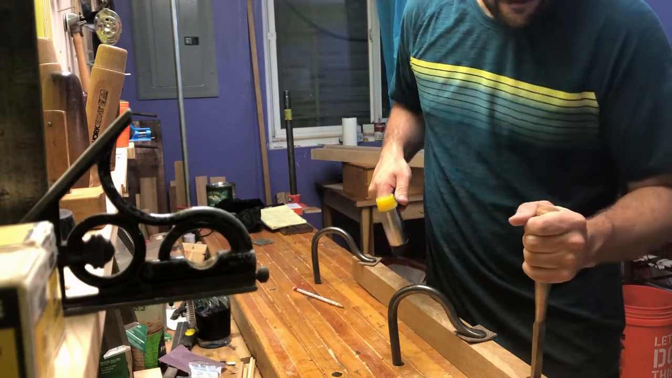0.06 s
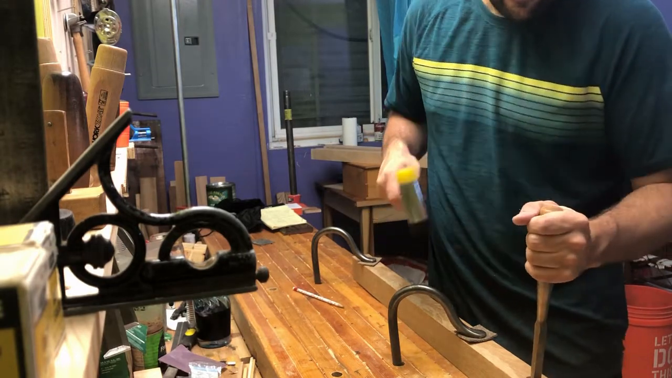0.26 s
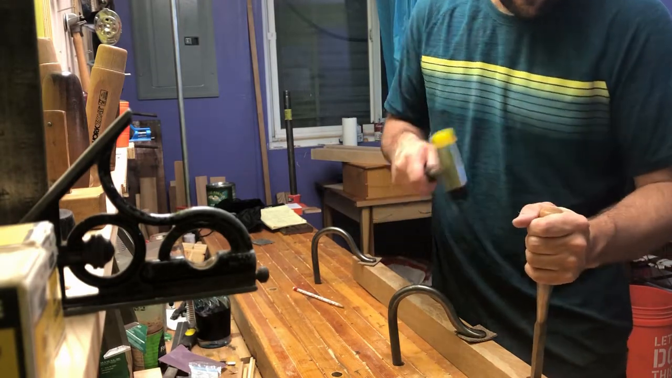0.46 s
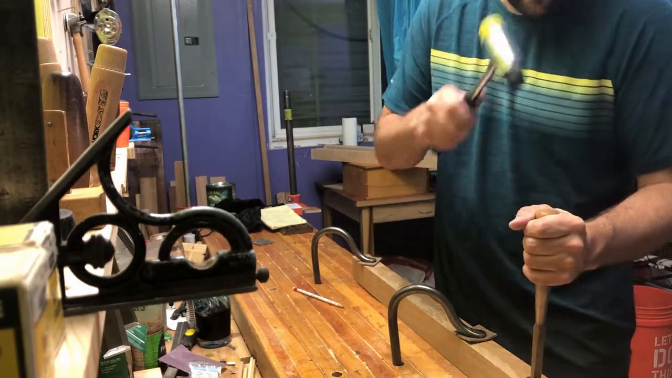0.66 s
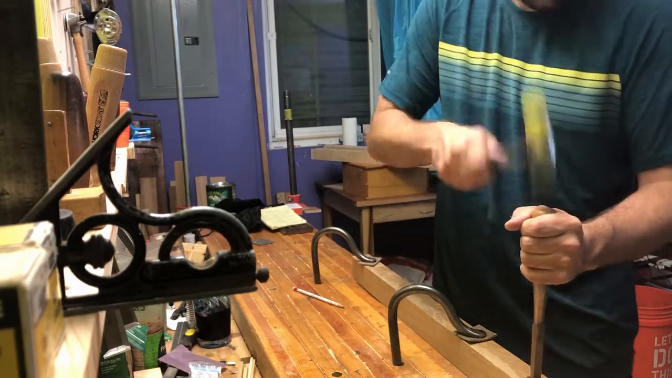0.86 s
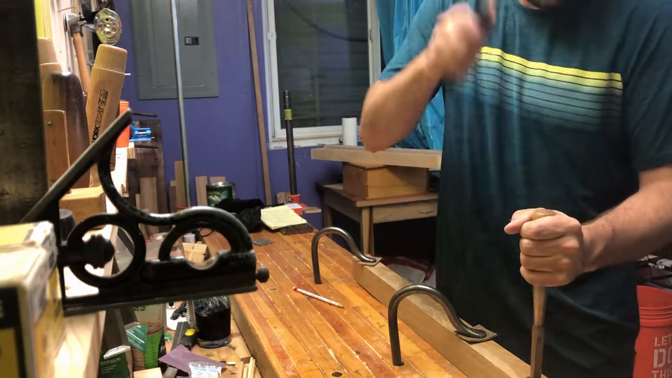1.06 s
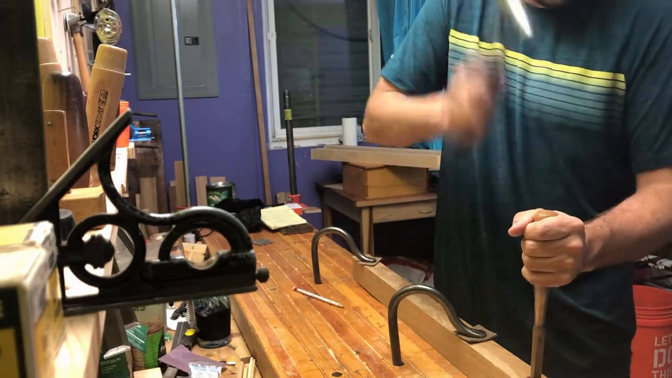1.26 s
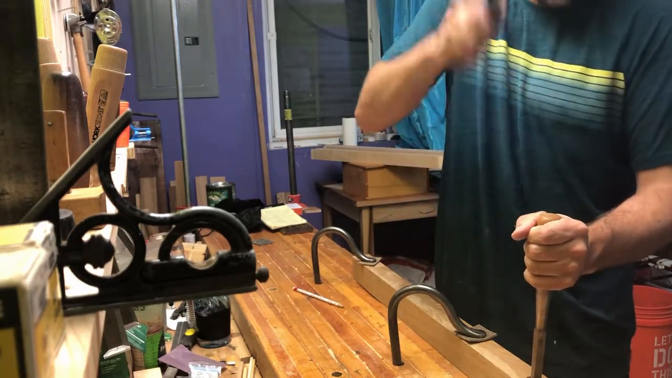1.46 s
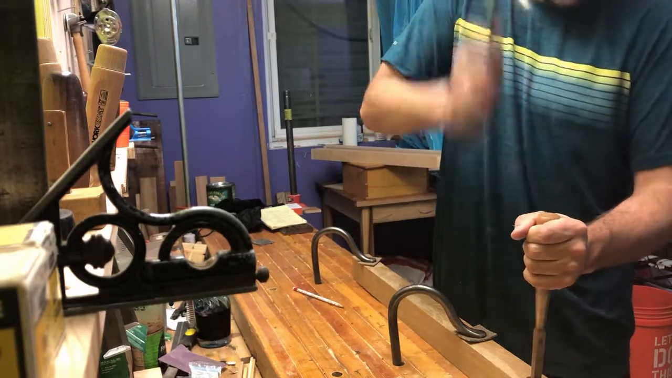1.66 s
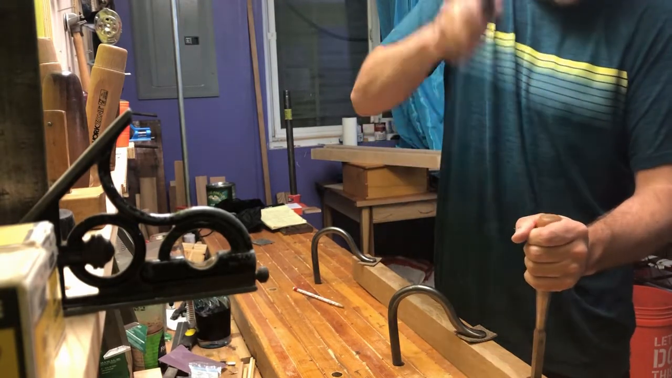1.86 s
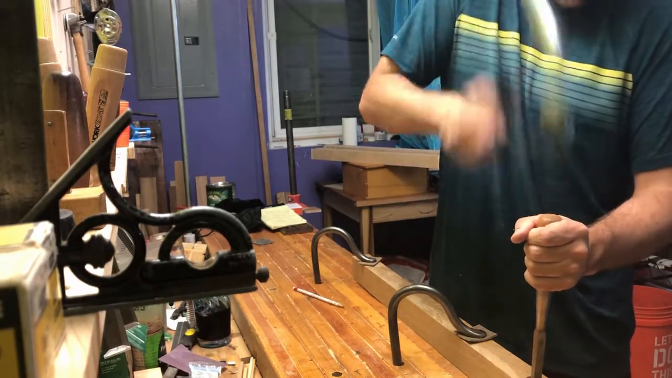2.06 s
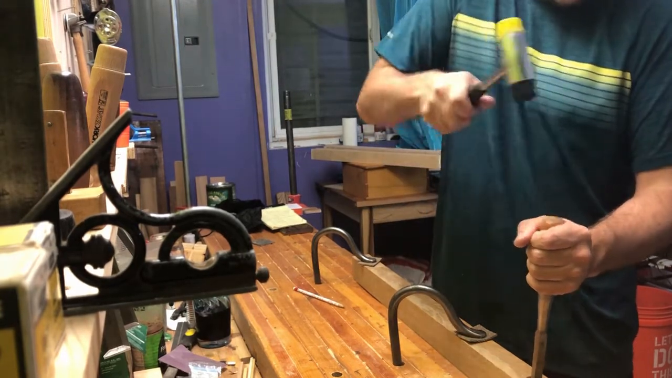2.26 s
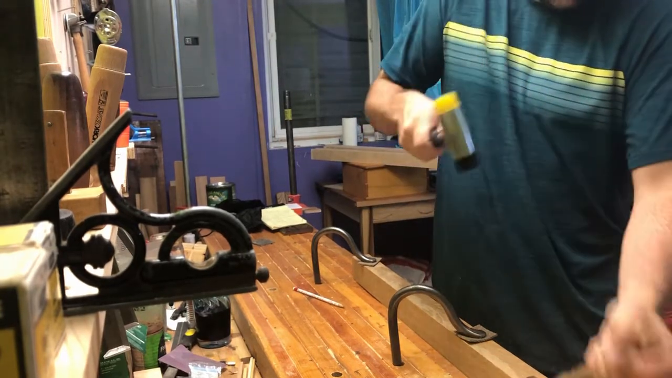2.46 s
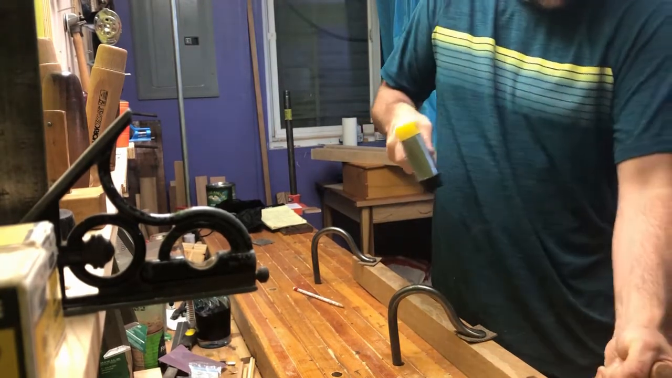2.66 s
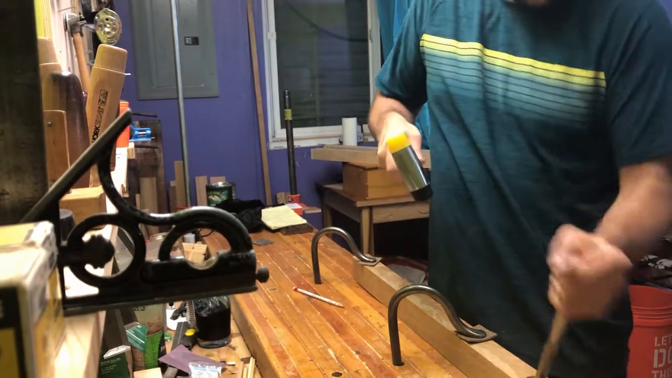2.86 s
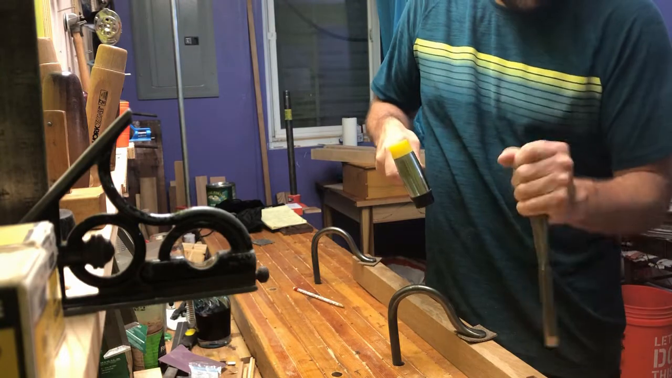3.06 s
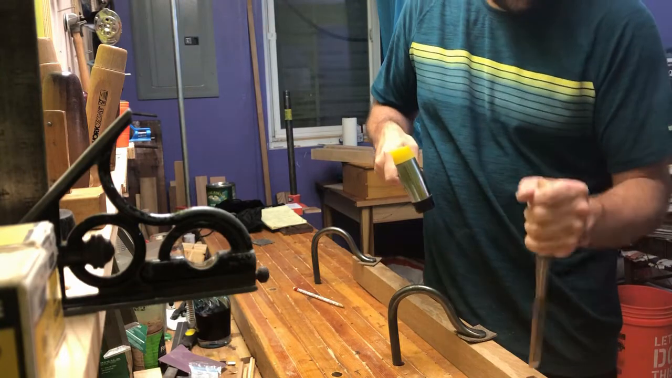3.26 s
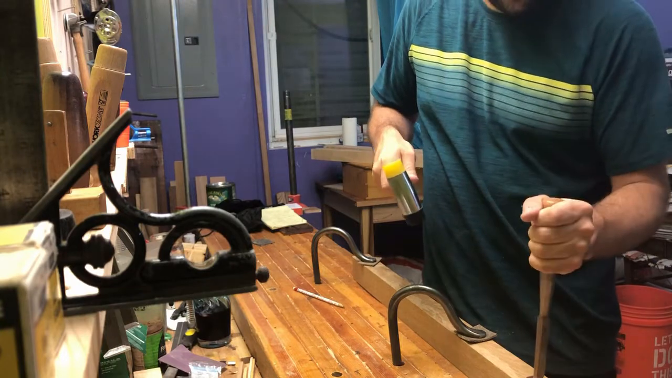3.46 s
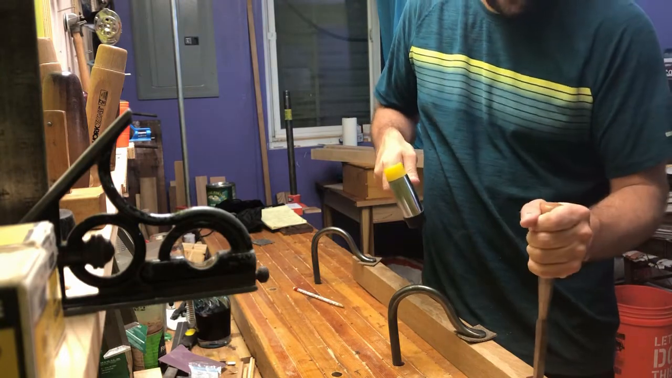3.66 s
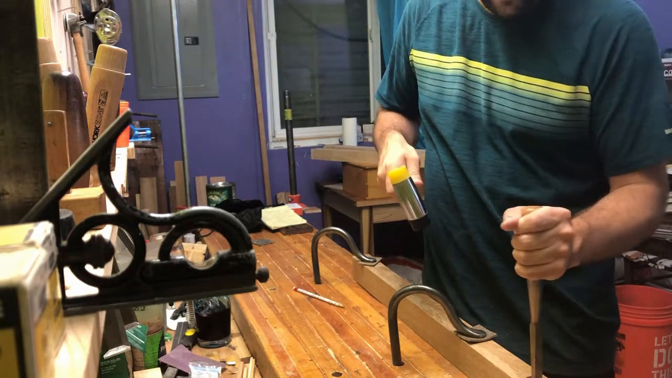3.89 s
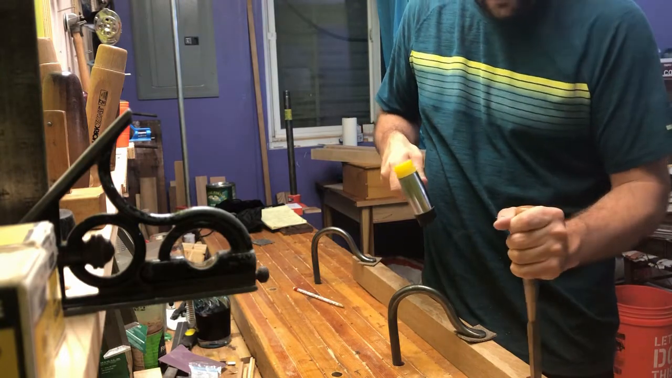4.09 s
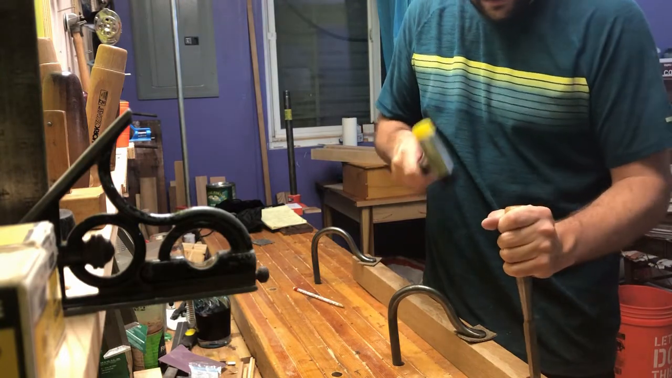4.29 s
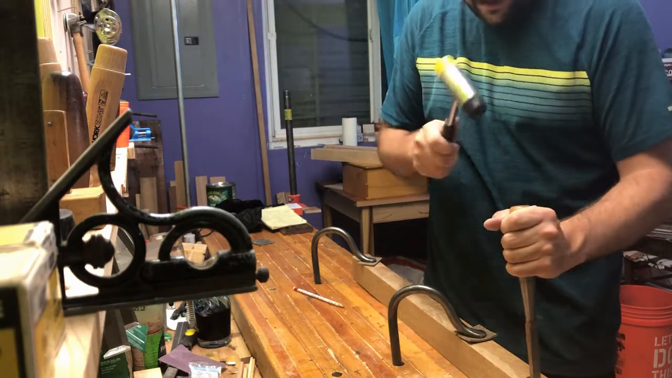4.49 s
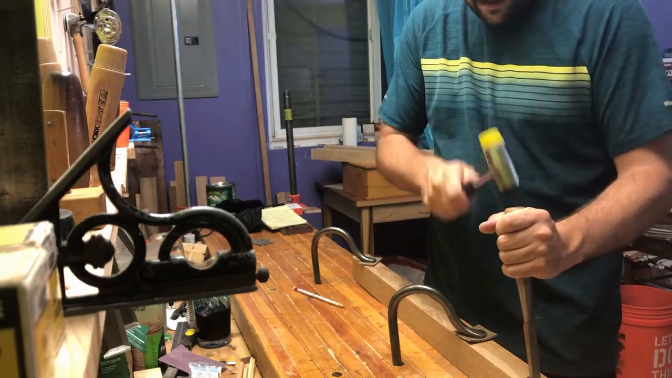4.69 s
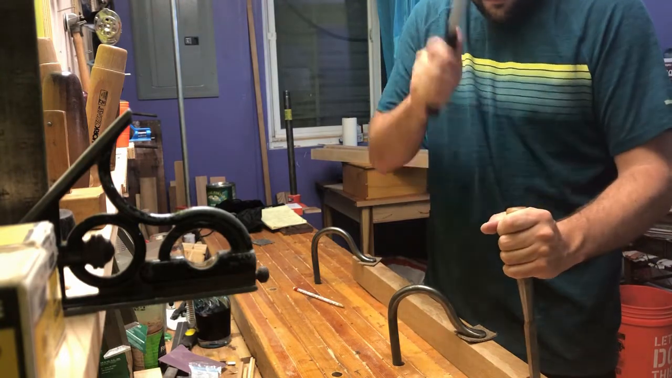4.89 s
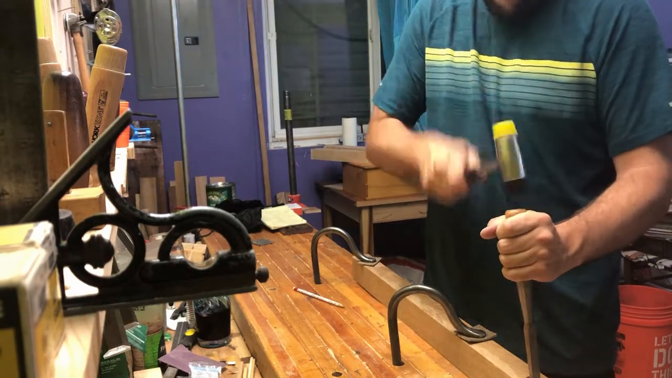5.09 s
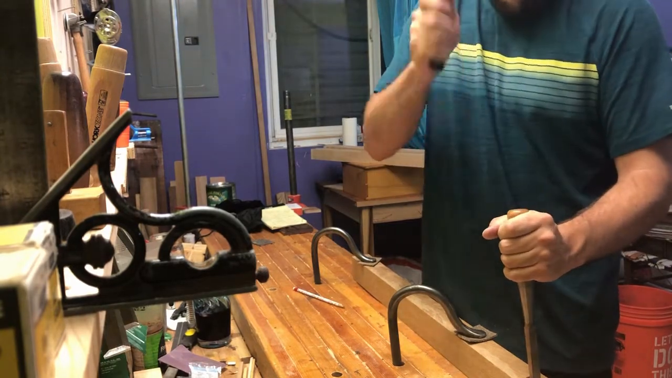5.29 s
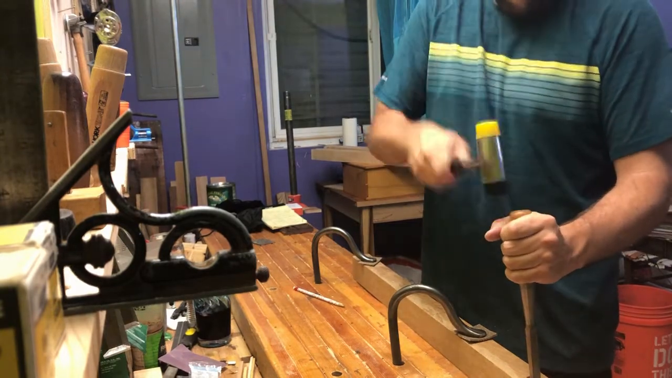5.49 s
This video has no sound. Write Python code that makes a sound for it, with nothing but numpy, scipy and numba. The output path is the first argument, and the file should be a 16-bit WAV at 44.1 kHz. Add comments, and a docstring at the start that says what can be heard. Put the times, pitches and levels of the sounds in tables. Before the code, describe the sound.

A mallet strikes a chisel into wood four times, then twice more after a pause, with sharp knocks in a small workshop.

```python
"""Chisel and mallet in a small workshop

Close to the bench, one microphone, low mains hum behind. A mallet drives a chisel into a clamped board:
four blows, the blade slides and bumps as it is levered out and reset, then two more. Each blow ticks on
the handle, cracks the fibres, knocks the board and shakes the bench, and the room rings on. The blows
vary in force, depth of cut and squareness; a limiter ducks the hard ones."""
import sys
import numpy as np
from scipy import signal
from scipy.fft import rfft, irfft
from scipy.io import wavfile
from scipy.ndimage import uniform_filter1d, minimum_filter1d
from numba import njit

SR = 44100
rng = np.random.default_rng(int(sys.argv[2]) if len(sys.argv) > 2 else 0)


def int16_out(signal):
    """Quantize to a 16-bit WAV file."""
    q = np.round(np.clip(np.atleast_2d(signal).T, -1, 1) * 32767)
    wavfile.write(sys.argv[1], SR, q.astype(np.int16))


N = 244093
T = np.arange(int(.9 * SR)) / SR  # time axis of one struck sound, in seconds


def undb(db):
    """Decibels to gain."""
    return 10 ** (np.asarray(db) / 20)


def along(points, hz):
    """Read (Hz, value) points on a log-frequency axis."""
    point_hz, value = np.transpose(points)
    return np.interp(np.log(np.maximum(hz, 1)), np.log(point_hz), value)


def noise(spectrum, count):
    """Noise of a given colour, rms 1."""
    hz = np.fft.rfftfreq(count, 1 / SR)
    x = irfft(undb(along(spectrum, hz)) * np.exp(2j * np.pi * rng.random(len(hz))), count)
    return x / x.std()


def soften(x, hz, order=2):
    """Low-pass: a softer contact passes less treble."""
    return signal.sosfilt(signal.butter(order, min(hz, SR / 2 - 1), fs=SR, output="sos"), x)


def thin(x, hz, order=2):
    """High-pass: small surfaces radiate little bass."""
    return signal.sosfilt(signal.butter(order, hz, "high", fs=SR, output="sos"), x)


def fade(t60_s):
    """Exponential decay, 60 dB in t60_s."""
    return np.exp(-np.log(1000) * T / t60_s)


def swell(rise_s):
    """A soft onset with the given time constant."""
    return 1 - np.exp(-T / rise_s)


def ring(modes, pitch=1, spread=0):
    """Struck modes; neighbours swing in opposite senses, and spread scatters their phases."""
    phases = np.pi * (np.arange(len(modes)) + 2 * spread * rng.random(len(modes)))
    return sum(undb(db) * fade(t60_s) * np.sin(2 * np.pi * f * pitch * T + phase)
               for (f, db, t60_s), phase in zip(modes, phases))


def click(spectrum, size=1024):
    """A single click of a given colour, energy 1."""
    cepstrum = irfft(np.log(undb(along(spectrum, np.fft.rfftfreq(size, 1 / SR)))))
    # minimum phase packs the energy at the start
    cepstrum[1:size // 2] *= 2
    cepstrum[size // 2 + 1:] = 0
    x = irfft(np.exp(rfft(cepstrum)))
    return x / np.linalg.norm(x)


def scatter(t60_s):
    """A brief, dense cluster of tiny pulses, energy 1."""
    x = rng.standard_normal(len(T)) * fade(t60_s)
    return x / np.linalg.norm(x)


def add(track, start_s, x):
    """Mix a sound into a track at a time."""
    i = max(int(start_s * SR), 0)
    track[i:i + len(x)] += x[:len(track) - i]


# mains hum in the background: pitch_hz, rms_db
HUM_TONES = [(59.5, -59), (119, -65), (178, -71), (241, -61.5), (306.8, -69.5), (387.6, -69)]
# still air of the workshop: frequency_hz, level_db
AIR_SPECTRUM = [(20, -36.5), (35, -22), (50, -10), (100, -7), (160, -6.5), (260, -11), (400, -15),
                (560, -20.5), (750, -29), (1500, -33), (3000, -39), (7000, -48), (16000, -53)]

def room_tone(air_db=-56):
    """Mains hum over a soft, dull rush of air."""
    t = np.arange(N) / SR
    hum = sum(undb(db) * np.sqrt(2) * np.sin(2 * np.pi * (hz * t + rng.random()))
              for hz, db in HUM_TONES)
    return hum + undb(air_db) * noise(AIR_SPECTRUM, N)


# steel rubbing on wood: frequency_hz, level_db
RUB_SPECTRUM = [(200, 6), (600, 12), (1000, 0), (2000, -8), (4500, -12), (6000, -13), (7800, -15),
                (10000, -17), (16000, -18)]

def blade_slide(length_s, stop_s=.006, squeak_hz=1720, sag_hz_per_s=5500, squeak_db=-5, grain_db=4):
    """Tiny slips of steel on wood: a grainy rub and a rough squeak that sags as the blade slows."""
    t = T[:int((length_s + stop_s) * SR)]
    slips = np.interp(t, t[::64], rng.standard_normal(len(t[::64])))
    pitch_hz = (squeak_hz - sag_hz_per_s * t) * (1 + .06 * slips)
    phase = 2 * np.pi * np.cumsum(pitch_hz) / SR
    squeak = np.sin(phase) + np.sin(2 * phase) / 2
    friction = noise(RUB_SPECTRUM, len(t)) + undb(squeak_db) * squeak
    rub = soften(friction * undb(grain_db * slips), 9000, order=1)
    return rub / rub.std() * signal.windows.tukey(len(t), .5)


# the blade moving in the mortise: bump_s, slide_length_s, slide_db, bump_db, board_pitch_hz
BLADE_MOVES = [(.619, 0.03, -53.5, -38.5, 340), (2.643, 0.023, -56.5, -48, 678),
               (3.097, 0.083, -57.5, -33, 375), (3.561, 0.0071, -57, -33, 389), (3.64, .01, -57, -34, 409),
               (3.980, 0.032, -54.5, -44.5, 495)]
# the board under a light touch: pitch_ratio, level_db, t60_s
BOARD_MODES = [(.52, -8, .05), (.93, 0, .06), (1.25, -2, .04), (3.3, -14, .02)]

def handling(touch_s=.0014, board_db=2, bench_db=-19, push_hz=230):
    """The blade slides in its cut and comes to rest against the board, stirring the bench."""
    out = np.zeros(N)
    bench = undb(bench_db) * soften(bench_ring(spread=1), push_hz)
    for bump_s, length_s, slide_db, bump_db, board_hz in BLADE_MOVES:
        board = undb(board_db) * ring(BOARD_MODES, board_hz)
        add(out, bump_s - length_s, undb(slide_db) * blade_slide(length_s))
        add(out, bump_s, undb(bump_db) * (board + bench) * swell(touch_s))
    return out


# the bench and the room around it: pitch_hz, level_db, t60_s
BENCH_MODES = [(81.3, -15.5, 0.47), (103.44, -15, 0.5), (136, -13.5, 0.63), (150.7, -13, 0.3),
               (177, -7.5, .35), (225.6, -7.5, 0.54), (250, -15, 0.17), (272.4, -0.5, .45),
               (275.4, -10, 0.78), (300.4, -5, 0.68), (337.4, 0, 0.44), (361, -3, .45), (384, -3, 0.29),
               (445, -3, 0.28), (484.3, -1.5, 0.54), (506.4, -1, 0.46), (527.6, -1, 0.38),
               (668, -3.5, 0.47), (767, -9, 0.26), (965, -6.5, 0.17)]

def bench_ring(spread):
    """A push on the bench leaves a long, low ringing."""
    return ring(BENCH_MODES, spread=spread)


# first reflections off bench, floor, ceiling and walls: delay_s, level_db
REFLECTIONS = [(.008, -8.5), (0.0132, -17), (0.0226, -6), (0.028, -12), (.047, -27), (.058, -13.5),
               (.072, -19)]
# reverberation of the small room: centre_hz, level_db, t60_s
REVERB_BANDS = [(60, -16, 0.39), (206, -4, 0.36), (450, -13, 0.52), (760, -1, 0.49), (1510, -4, 0.47),
                (3000, 0.5, 0.45), (5960, 0.5, 0.43), (10000, 3, 0.35), (16000, -7.5, 0.26)]

def workshop(direct_db=-1, clutter_db=1, wet_db=-28.5, gap_s=.0098, build_s=.017):
    """Paths to the microphone: direct, off the clutter, off the walls, then a tail losing its treble."""
    hz = np.fft.rfftfreq(len(T), 1 / SR)
    diffuse = rfft(rng.standard_normal(len(T)))
    centres_hz = [row[0] for row in REVERB_BANDS]
    tail = 0
    for share, (_, db, t60_s) in zip(np.eye(len(REVERB_BANDS)), REVERB_BANDS):
        band_gain = along(list(zip(centres_hz, share)), hz)
        tail = tail + undb(db) * irfft(diffuse * band_gain, len(T)) * fade(t60_s)
    # long waves pass round the tools on the bench; short ones are scattered by them
    response = undb(direct_db) * soften(signal.unit_impulse(len(T)), 1700)
    add(response, 0, undb(clutter_db) * thin(scatter(t60_s=.03), 1900))
    for delay_s, db in REFLECTIONS:
        echo = soften(scatter(t60_s=.018), 6000, order=1)
        add(response, delay_s, undb(db) * thin(echo, 250))
    add(response, gap_s, undb(wet_db) * tail * swell(build_s))
    return response


# mallet face meeting the handle: frequency_hz, level_db
TICK_SPECTRUM = [(300, -23.5), (1800, 6.5), (3500, 6), (6000, -1.5), (9000, 0), (12000, -7.5), (16000, 0.5)]

def contact_tick():
    """Two hard surfaces meet in one bright click."""
    return click(TICK_SPECTRUM)


# the mallet's strokes at the bench: start_s, force_db, cut_depth_db, squareness_db
STROKES = [(1.0039, -6, -7.5, -1.5), (1.4328, 0.5, 0.8, -3.5), (1.8253, 1.66, 2, -0.5),
           (2.2047, 1, 1.16, -11), (4.8022, -4.5, -6, -7.5), (5.1883, 1.5, 0.92, 2)]
# the board's first, heavily damped thump: pitch_hz, level_db, t60_s
THUMP_MODES = [(100, -14.5, 0.082), (217, 5.5, 0.036), (421, 7.5, .03), (680, -5, 0.023)]

def mallet_blows(tick_lead_s=.0034, thump_lag_s=.00396, tick_db=-10, thump_db=-3, bench_db=-18,
                 boom_hz=206.4, boom_db=-12.5, boom_t60_s=.4, rise_s=.00067):
    """The mallet ticks on the handle, the edge bites, then the bench gives and booms."""
    out = np.zeros(N)
    bench = bench_ring(spread=.92) * swell(rise_s)
    boom = ring([(boom_hz, boom_db, boom_t60_s)]) * swell(rise_s)
    thump = thin(ring(THUMP_MODES), 77)
    tick = undb(tick_db) * contact_tick()
    for start_s, force_db, cut_db, square_db in STROKES:
        push_hz = 550 * 2 ** (.29 * force_db)  # a harder blow is a shorter, brighter push
        bite, direct = chisel(force_db, cut_db, square_db)
        add(bite, thump_lag_s, undb(thump_db + force_db) * soften(thump, push_hz))
        # arm and mallet move, so the reflections differ from blow to blow
        add(out, start_s - tick_lead_s, undb(square_db) * signal.fftconvolve(tick, workshop()))
        add(out, start_s, signal.fftconvolve(bite, workshop()))
        add(out, start_s, direct)
        add(out, start_s + thump_lag_s, undb(force_db) * clamp_chatter())
        # the bench top's main bending mode booms even at a light blow; higher modes need a hard one
        shake = boom + undb(bench_db) * soften(bench, push_hz, order=1)
        add(out, start_s + thump_lag_s, undb(force_db) * shake)
    return out


# chisel and mallet head pressed together: pitch_ratio, level_db, t60_s
KNOCK_MODES = [(.7, -7, .018), (.87, -4, .014), (.96, -1, .016), (1.08, -2, .014), (1.24, -8, .014),
               (1.39, -5, .014), (2.2, -19, .012), (2.97, -13, .013), (3.55, -17, .012)]
# splitting wood fibres: frequency_hz, level_db
CRACK_SPECTRUM = [(40, -19), (200, 8.5), (400, -2.5), (750, 7), (1100, -1), (1450, 14.5), (2000, -4),
                  (2600, -6.5), (4500, -7.5), (7000, -16.5), (11000, -19.5), (16000, -17)]
# the handle, damped by the fist: pitch_hz, level_db, t60_s
HANDLE_MODES = [(970, -1, .035), (1270, -2, .035), (1800, 0, .035), (2780, -5, .04), (3750, -3, .025),
                (4500, -3, .025), (8000, -7, .02), (9600, -7, .02)]
# the free steel of the blade: pitch_hz, level_db, t60_s
BLADE_MODES = [(3260, 3, .03), (7230, 0, .11), (7285, -2, .11)]

def chisel(force_db, cut_db, square_db, dull_hz=1800, rebound_s=.0035, rebound_db=-6):
    """The edge bites and the tool rings. Returns what fills the room and what arrives direct."""
    # a deeper cut splits more fibres and seats the chisel tighter, so it knocks louder and higher
    knock_hz = 1423.3 * 2 ** (.0856 * cut_db)
    knock = undb(-2 + 1.85 * cut_db) * thin(ring(KNOCK_MODES, knock_hz), 280)
    crack = undb(10 + 2.4 * cut_db) * click(CRACK_SPECTRUM)
    handle = undb(-33 + force_db) * ring(HANDLE_MODES)
    blade = undb(-42.5 + 6 * force_db) * ring(BLADE_MODES)  # rings far more under a hard blow
    bite = handle + blade + soften(knock, dull_hz)
    add(bite, 0, crack)
    # the chisel faces the microphone: knock, judder and snaps (louder on a square hit) arrive dry
    splits = scatter(t60_s=.022) * swell(rise_s=.0006)
    snaps = thin(signal.fftconvolve(crack, splits)[:len(T)], 1500)
    judder = soften(signal.fftconvolve(knock, scatter(t60_s=.03)), dull_hz)
    direct = undb(-3.5) * knock + undb(10 + square_db) * snaps
    add(direct, rebound_s, undb(rebound_db) * judder)
    return bite, direct


def clamp_chatter(gain_db=17, low_hz=600, high_hz=1300, t60_s=.12):
    """The board chatters in its clamps as it is driven against the bench."""
    return undb(gain_db) * thin(soften(scatter(t60_s), high_hz), low_hz)


# dry ticks while the mallet is raised: start_s, level_db
FAINT_TICKS = [(1.307, -38), (1.355, -39.5), (4.36, -46)]

def faint_ticks(t60_s=.0032, low_hz=3500):
    """Tiny ticks close to the microphone, too faint to stir the room."""
    out = np.zeros(N)
    for start_s, db in FAINT_TICKS:
        tick = signal.fftconvolve(contact_tick(), scatter(t60_s))
        add(out, start_s, undb(db) * thin(tick, low_hz))
    return out


def scene():
    """Everything reaches one microphone by the bench, the same in both channels."""
    blows = mallet_blows()
    handling_in_room = signal.fftconvolve(handling(), workshop())[:N]
    mono = blows + handling_in_room + faint_ticks() + room_tone()
    return np.array([mono, mono])


@njit
def held_peak(size, release):
    """An envelope that jumps to each peak and sinks back slowly."""
    out, held = np.empty(len(size)), 0.
    for i in range(len(size)):
        held = max(size[i], held * release)
        out[i] = held
    return out


def record(dry, ceiling=.61, release_s=.017, top_hz=16000):
    """Behind the microphone, a look-ahead limiter ducks the hard blows; the top treble is cut."""
    peak = held_peak(np.abs(dry[0]), np.exp(-1 / (release_s * SR)))
    gain = ceiling / np.maximum(peak, ceiling)
    gain = uniform_filter1d(minimum_filter1d(gain, size=65), size=65)  # eases down ahead of each peak
    lowpass = signal.ellip(8, .2, 70, top_hz, fs=SR, output="sos")
    return signal.sosfilt(lowpass, dry * gain)


dry = scene()
out = record(dry)
int16_out(out)
```